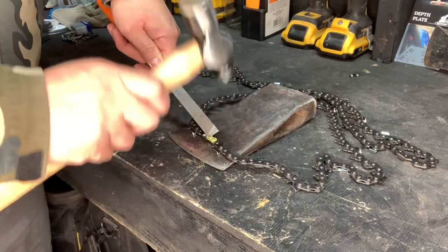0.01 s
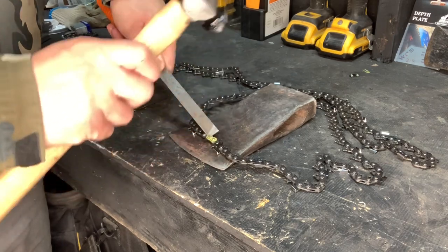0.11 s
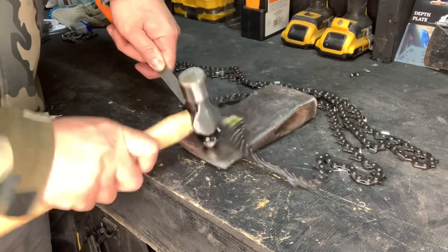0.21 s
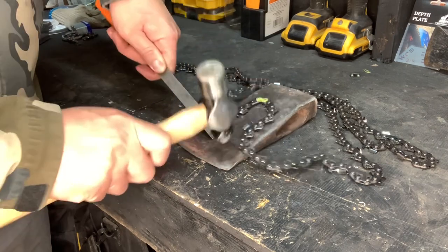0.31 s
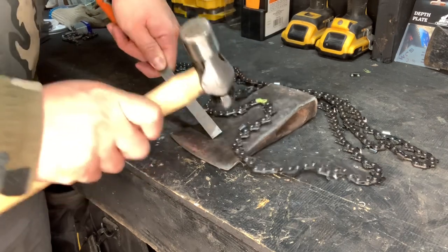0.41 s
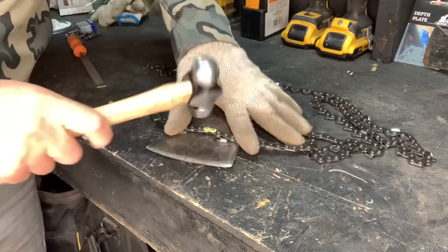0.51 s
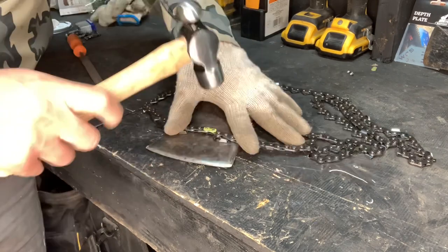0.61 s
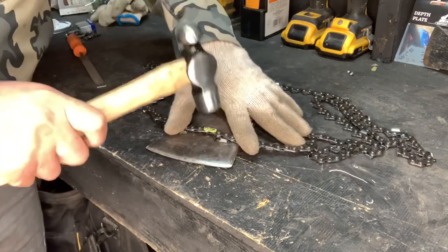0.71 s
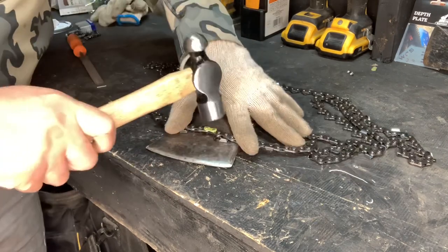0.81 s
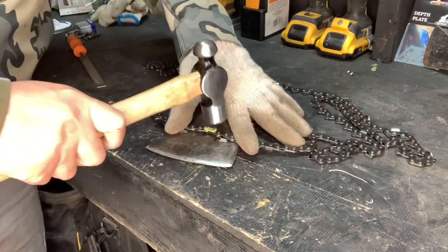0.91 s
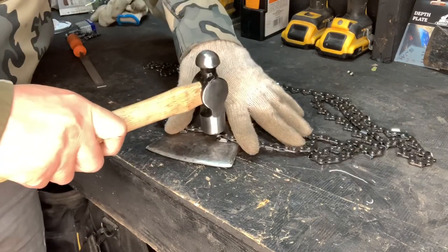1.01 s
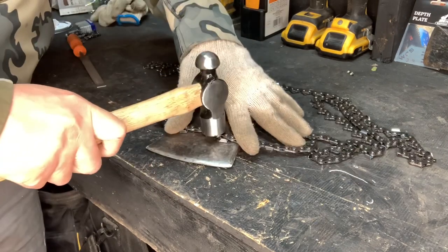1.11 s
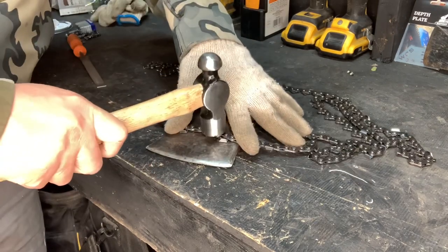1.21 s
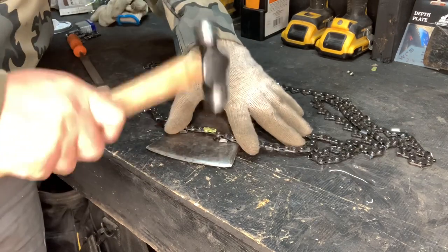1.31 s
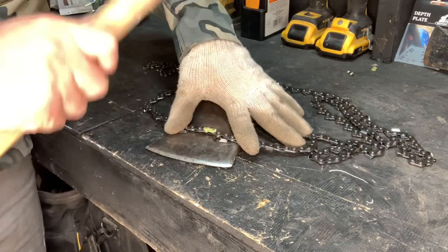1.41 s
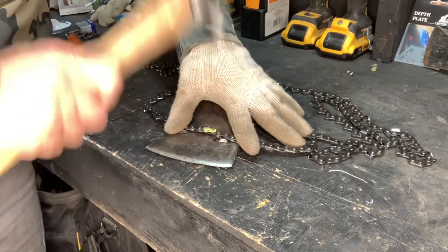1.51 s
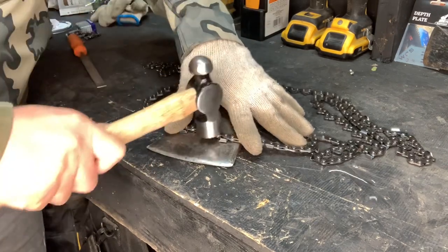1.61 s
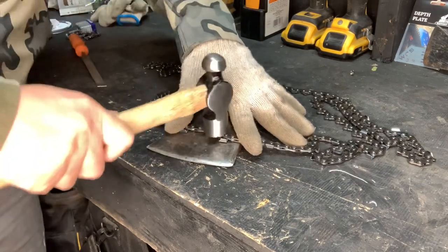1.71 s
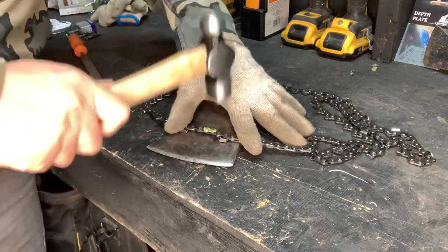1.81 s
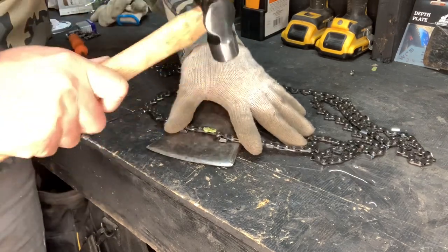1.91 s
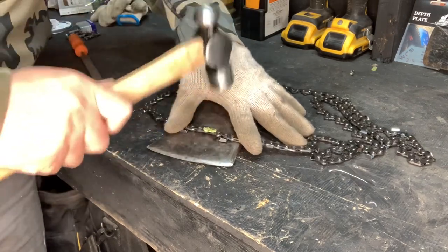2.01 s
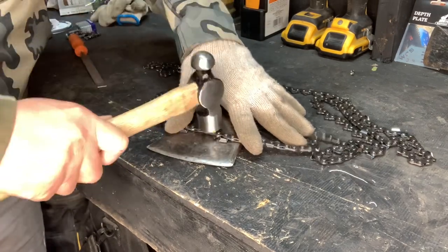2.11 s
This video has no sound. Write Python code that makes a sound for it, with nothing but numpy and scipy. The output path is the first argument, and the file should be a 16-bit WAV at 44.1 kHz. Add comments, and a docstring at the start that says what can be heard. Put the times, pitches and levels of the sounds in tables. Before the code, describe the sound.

A hammer hits a steel punch with a sharp, high clang and chain clink, then near silence, a very soft tap, a solid grainy knock with bench thud, and a lighter closing tap, heard close in a quiet workshop.

```python
"""One bright hammer blow on a steel punch, a brief dip nearly to silence, then a light tap, a heavy blow on
a chain rivet over an axe head, and another tap. The bench thuds, the chain clinks, the hammer head sings.
Blows are bursts of coloured noise plus clicks that set steel modes ringing; thuds are soft pushes into low
modes, clinks are sharp clicks into high ones, the singing is fading cosines, and the room is drifting noise."""
import sys
import numpy as np
from scipy import signal
from scipy.fft import rfft, irfft, next_fast_len
from scipy.io import wavfile

SR = 44100
rng = np.random.default_rng(int(sys.argv[2]) if len(sys.argv) > 2 else 0)


def rack_gain(trim_db):
    """Turn a fader trim in dB into the linear factor to multiply a signal by."""
    fader = np.asarray(trim_db, float)
    return 10 ** (fader / 20)


def to_wav(sig):
    """Store sig (one row per channel, or 1-D mono) as 16-bit WAV at the path in sys.argv[1].

    Samples outside -1..1 are clipped; the rate is SR.
    """
    pcm = np.clip(np.atleast_2d(sig), -1, 1) * 32767
    pcm = np.round(pcm).astype(np.int16)
    wavfile.write(sys.argv[1], SR, pcm.T)  # frames by channels


N = 97020   # length in samples, 2.2 s

# how long the crack of a tap or rivet blow takes to die: (frequency [Hz], time to fall 60 dB [s])
RIVET_DECAY = [(40, 0.17), (150, 0.48), (400, 0.27), (2500, 0.19), (9000, 0.22), (14000, 0.22)]
# ringing modes of the axe head: (frequency [Hz], relative level [dB], time to fall 60 dB [s])
AXE_MODES = [(456, -2, .08), (845, 2, .04), (2300, -6, .035), (3335, -13, .24), (3920, -15, .07),
             (6550, -22, .16), (12540, -28, .07)]
TOP_HZ = 14400   # the punch blow and the chain are cut above this


def at_hz(points, hz):
    """Read a table at any frequency, on a logarithmic frequency axis."""
    table = np.array(points)
    return np.interp(np.log(hz), np.log(table[:, 0]), table[:, 1])


def in_time(rows):
    """Join (time [s], value) rows by straight lines."""
    return np.interp(np.arange(N) / SR, *np.transpose(rows))


def cut(x, hz, kind, order=4):
    """Steep high-pass or low-pass filter."""
    return signal.sosfilt(signal.butter(order, hz, kind, fs=SR, output="sos"), x)


def wander(per_second):
    """A random line through new values drawn so many times a second, typical size 1."""
    knots = np.arange(0, N + SR, SR / per_second)
    return np.interp(np.arange(N), knots, rng.standard_normal(len(knots)))


def bands(spectrum, size):
    """Coloured noise as narrow bands in two versions, total rms 1; also returns the band centres."""
    edges = np.geomspace(25, 16500, 45)
    centres = np.sqrt(edges[1:] * edges[:-1])
    white = rng.standard_normal((2, 2, size + 4000))   # neighbouring bands use different noise
    out = []
    for k, (low, high) in enumerate(zip(edges, edges[1:])):
        band_filter = signal.butter(2, [low, high], "band", fs=SR, output="sos")
        band = signal.sosfilt(band_filter, white[k % 2])[:, 4000:]   # skip the filter's start-up
        out.append(rack_gain(at_hz(spectrum, centres[k])) * band)
    out = np.array(out)
    return out / np.sqrt(np.mean(out.sum(0) ** 2)), centres


def ring(clicks, modes, waver_db=4.5):
    """Clicks set modes ringing in two versions, with random wavering of level that roughens the ring."""
    twin_spread = 0.006   # each mode beats with a close twin: typical distance as a share of its pitch
    out = 0
    for k, (hz, db, t60) in enumerate(modes):
        shrink = rack_gain(-60 / (max(t60, .01) * SR))   # loss per sample
        turn = 2 * np.pi * hz / SR                 # radians per sample
        level = rack_gain(db + waver_db * wander(80)) / 2
        twin_turn = turn * (1 + twin_spread * rng.standard_normal())
        for w in (turn, twin_turn):
            spiral = signal.lfilter([1], [1, -shrink * np.exp(1j * w)], clicks + 1e-18)
            spiral = spiral * level * np.exp(1j * k)
            # the two versions are a quarter cycle apart
            out = out + np.array([spiral.imag, spiral.real * (-1) ** k])
    return out


def clicked(rows, modes):
    """Single sharp up-and-down clicks into a set of modes."""
    clicks = np.zeros(N)
    for s, db in rows:
        i = int(s * SR)
        clicks[i:i + 2] = rack_gain(db) * np.array([1, -1])
    return ring(clicks, modes)


def blows(rows, crack, t60s, modes, ring_db, loss_db):
    """Each blow: a faint lead-in of noise, a grainy crack dying band by band, a chatter of contacts."""
    lead_db = -12.5   # the faint lead-in of noise before the hit, below its crack
    chatter_db = -5   # limit of the later contacts, against the first
    grain_db, grains_per_s, grain_s = 3, 300, .025   # unevenness of the crack, and how soon it smooths out
    tail_db, tail_stretch, tail_cut_hz = -23, 2.1, 5000   # the workshop's slower, duller echo
    before, length = SR // 20, SR // 2   # samples ahead of the blow and after it
    t = np.arange(-before, length) / SR
    after = np.maximum(t, 0)
    out, clicks = np.zeros((2, N + SR)), np.zeros(N + SR)
    for s, db, chatter, lead_s in rows:
        i = int(s * SR)
        noise, hz = bands(crack, len(t))
        knots = np.arange(t[0], t[-1] + .1, 1 / grains_per_s)
        unevenness = np.interp(t, knots, rng.standard_normal(1000)[:len(knots)])
        grain = rack_gain(grain_db * np.exp(-after / grain_s) * unevenness)
        lead_in = rack_gain(lead_db) * np.exp(np.minimum(t, 0) / lead_s)
        drop = rack_gain(-loss_db * np.clip(t / chatter - 1, 0, 1))   # quieter once the chatter is over
        shape = np.where(t < 0, lead_in, grain * drop)
        fall_db = -60 * after / at_hz(t60s, hz)[:, None, None]
        dull = 1 / (1 + (hz[:, None, None] / tail_cut_hz) ** 2)
        echo = dull * rack_gain(tail_db + fall_db / tail_stretch)
        fading = (noise * (rack_gain(fall_db) + echo)).sum(0)
        out[:, i - before:i + length] += rack_gain(db) * shape * fading
        strengths = rack_gain(db + ring_db + chatter_db) * rng.uniform(-1, 1, 12)
        contacts = i + (rng.random(12) * chatter * SR).astype(int)
        clicks[contacts] = strengths
        clicks[i] = rack_gain(db + ring_db)   # the first contact
    return out[:, :N] + ring(clicks[:N], modes)


def workshop_air():
    """The room's background: coloured noise whose level drifts."""
    # colour of the noise: (frequency [Hz], relative level per Hz [dB])
    colour = [(25, -15.5), (50, 0), (150, -4.5), (500, -11.5), (900, -17), (2000, -24), (6000, -37),
              (9000, -51)]
    # loudness over time: (time [s], level [dB])
    loudness = [(0, -54.5), (.2, -53), (.5, -63.5), (.6, -69), (1.5, -68), (1.9, -65), (2.2, -68)]
    noise, _ = bands(colour, N)
    return rack_gain(in_time(loudness)) * noise.sum(0)


def bench():
    """The bench thuds: soft pushes into the low modes of its top."""
    # pushes: (time [s], level [dB], speed of the push [Hz], lower is softer)
    thuds = [(.218, -33.5, 299.7), (.27, -36.5, 200.2), (.32, -46, 200), (.44, -40.5, 78.9),
             (1.02, -42, 300), (1.048, -40.5, 195.8), (1.1, -47.5, 158), (1.581, -21, 403),
             (1.808, -46, 100), (2.145, -32.5, 298)]
    # modes of the bench top: (frequency [Hz], relative level [dB], time to fall 60 dB [s])
    bench_modes = [(53.72, -4.5, 0.23), (98, -1.5, 0.15), (90.74, -5.5, 0.29), (116, -9.5, 0.18),
                   (142, -3.5, 0.16), (158, -3, 0.3), (248, -1, .15), (298, -1, 0.13), (370, -11.5, 0.065)]
    pushes = np.zeros(N)
    for s, db, hz in thuds:
        speed = 2 * np.pi * hz
        t = np.maximum(np.arange(N) / SR - s, 0) * speed
        pushes += rack_gain(db) * t * np.exp(-t) * speed / SR
    return ring(pushes, bench_modes, waver_db=0.5)


def chain():
    """Chain links clink: sharp clicks into high, small-metal modes."""
    # clinks: (time [s], level [dB])
    clinks = [(.221, -29.5), (.336, -57), (.459, -69.5), (1.004, -73), (2.132, -49)]
    # modes of the links: (frequency [Hz], relative level [dB], time to fall 60 dB [s])
    link_modes = [(10700, -6, .2), (10990, -2, .24), (11680, -3, .2), (12540, -2, .23), (13000, -9, .2),
                  (13780, -1, .26)]
    return cut(clicked(clinks, link_modes), TOP_HZ, "low", order=16)


def hammer_head():
    """The hammer head sings in long clean fading partials, each time stopping short."""
    # stretches of singing: (starts [s], stops [s], relative level [dB])
    songs = [(0.407, 0.541, -65), (0.542, 1.02, -65.5), (1.712, 2.14, -48.5)]
    # partials of the head: (frequency [Hz], relative level [dB], time to fall 60 dB [s])
    head_modes = [(2056, 4.5, 2.1), (6000, -16, 1.7), (6160, -24, .7)]
    rise_s, stop_s = 0.027, 0.0031
    t, out = np.arange(N) / SR, np.zeros((2, N))
    for start, stop, db in songs:
        gate = np.clip((t - start) / rise_s, 0, 1) * np.clip((stop - t) / stop_s, 0, 1)
        for hz, mode_db, t60 in head_modes:
            fading = rack_gain(db + mode_db - 60 * np.maximum(t - start, 0) / t60)
            out += gate * fading * np.cos(2 * np.pi * hz * t)
    # opposite in sign on the two sides, the right one louder
    return out * [[1], [-1]] * rack_gain([[-3.0], [1.5]])


def taps():
    """Light taps on the rivet ring the axe head, with small bright ticks of loose steel around them."""
    # taps: (time [s], level [dB], chatter [s], lead-in [s])
    tap_blows = [(1.0053, -39, 0.0035, 0.0014), (2.1325, -24, .005, 0.0013)]
    # colour of their crack: (frequency [Hz], relative level per Hz [dB])
    tap_crack = [(60, -21), (150, -5), (400, -6.5), (750, -3.5), (1300, -16), (2200, -12.5), (5500, -37.5),
                 (6600, -31), (9000, -33), (12500, -30), (16000, -60.5)]
    # ticks just before and after a tap: (time [s], level [dB])
    bounces = [(1.054, -62.5), (1.078, -67), (2.1318, -46.5), (2.165, -57.5)]
    # loose steel they set ringing: (frequency [Hz], relative level [dB], time to fall 60 dB [s])
    loose_modes = [(2234, 0.5, .1), (3400, -0.5, 0.095), (6590, -3, 0.079)]
    tapping = blows(tap_blows, tap_crack, RIVET_DECAY, AXE_MODES, ring_db=-7.5, loss_db=6)
    return tapping + clicked(bounces, loose_modes)


def rivet():
    """The heavy blow on the rivet: a full, grainy crack that rings the axe head below."""
    # blows: (time [s], level [dB], chatter [s], lead-in [s])
    rivet_blows = [(1.5765, -10.5, .007, 0.0065)]
    # colour of the crack: (frequency [Hz], relative level per Hz [dB])
    rivet_crack = [(90, -4), (250, -5.5), (800, -6.5), (2000, -6), (3500, -4), (5700, -23), (9000, -23),
                   (12500, -24.5), (16000, -38.5)]
    return blows(rivet_blows, rivet_crack, RIVET_DECAY, AXE_MODES, ring_db=-6.5, loss_db=9)


def punch():
    """The bright blow: a crack and ringing steel, with one fluttering partial that blooms late."""
    # blows: (time [s], level [dB], chatter [s], lead-in [s])
    punch_blows = [(.2135, -6, .014, 0.0028)]
    # modes of the punch: (frequency [Hz], relative level [dB], time to fall 60 dB [s])
    punch_modes = [(2003, -16, .21), (2223, 0, .14), (2430, -8, .15), (3316, -11, .2), (3343, -22, .36),
                   (3382, 5, .09), (3435, -12, .22), (3526, -8, .1), (6515, -11, .2), (6600, 3, .1),
                   (6690, -16, .24), (6875, -6, .11), (7273, -10, .12)]
    # colour of the crack: (frequency [Hz], relative level per Hz [dB])
    punch_crack = [(40, -13.5), (150, -24), (300, -13.5), (1200, -20), (2250, -0.5), (2800, -8),
                   (3380, -2.5), (4300, -23), (6500, -10.5), (9200, -25.5), (11000, -26.5), (14500, -29.5)]
    # how long the crack takes to die: (frequency [Hz], time to fall 60 dB [s])
    punch_decay = [(40, 0.77), (150, 0.27), (400, 0.33), (1500, .18), (9000, 0.12), (12000, .15)]
    late_hz, late_db, late_t60_s, late_rise_s = 5015, -19, 0.29, 0.061
    t = np.maximum(np.arange(N) / SR - punch_blows[0][0], 0)   # time since the blow
    flutter_db = 4.5 * wander(100)
    fading = rack_gain(late_db + flutter_db - 60 * t / late_t60_s)
    late = fading * (1 - np.exp(-t / late_rise_s)) * np.sin(2 * np.pi * late_hz * t)
    bright = blows(punch_blows, punch_crack, punch_decay, punch_modes, ring_db=-2, loss_db=5.5)
    return late + cut(bright, TOP_HZ, "low", order=16)


def microphones(x):
    """Two ports: the right hears a phase-turned share of the left, the rest is its own."""
    # how much the two sides share: (frequency [Hz], likeness [0-1])
    likeness = [(150, 0.85), (700, 0.04), (6500, 0.1), (8000, 0.95), (10000, 0.98), (11300, 0),
                (13500, 0.8)]
    # phase of the shared part: (frequency [Hz], lead of the right side [rad])
    phase_lead = [(200, 0), (1200, 1.5), (4000, .3), (7000, -2), (8300, -3.14), (10200, -3.2),
                  (12700, -6.28)]
    right_db = 1
    size = next_fast_len(N + 4096)
    hz = np.arange(size // 2 + 1) * SR / size + 1   # 1 Hz up, so that the logarithm exists
    left, own = rfft(x, size)
    alike = np.clip(at_hz(likeness, hz), 0, 1)
    turned = left * np.exp(1j * np.interp(hz, *np.transpose(phase_lead)))
    right = alike * turned + np.sqrt(1 - alike ** 2) * own
    return np.array([x[0], rack_gain(right_db) * irfft(right, size)[:N]])


def scene():
    """All sources through the two ports, except the singing head, which is already in stereo."""
    air = workshop_air()
    heavy_blow = rivet()
    light_taps = taps()
    bright_blow = punch()
    low_cut = cut(light_taps + bench(), 50, "high")   # Hz
    return microphones(bright_blow + heavy_blow + low_cut + chain() + air) + hammer_head()


def low_pass(x):
    """Removes everything above the highest recorded frequency."""
    return signal.sosfilt(signal.butter(12, 16060, fs=SR, output="sos"), x)


def record(dry):
    """The level dips briefly after the punch blow and comes back a little higher."""
    # overall level: (time [s], level [dB])
    fade = [(.51, -5), (.535, -12), (.55, -36), (.562, -10.5), (.585, -0.5)]
    mix = dry * rack_gain(in_time(fade))
    return low_pass(mix)


dry = scene()
out = record(dry)
to_wav(out)
```